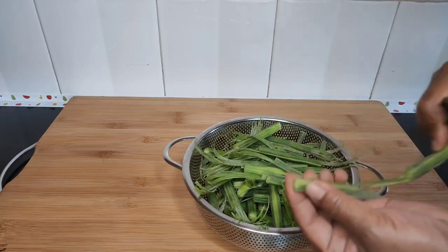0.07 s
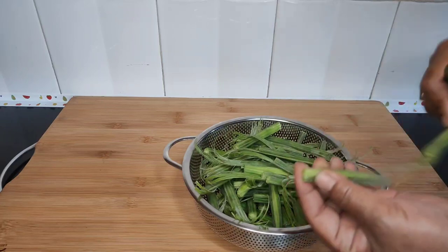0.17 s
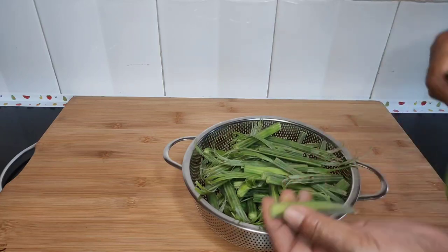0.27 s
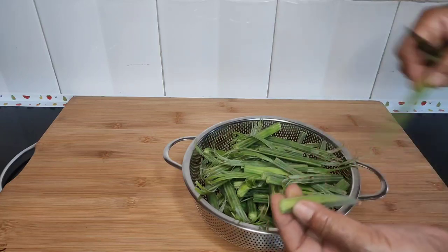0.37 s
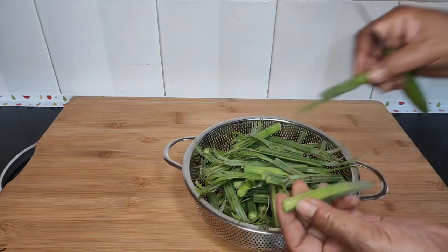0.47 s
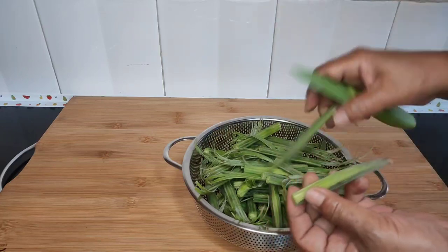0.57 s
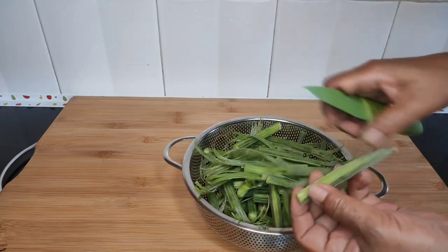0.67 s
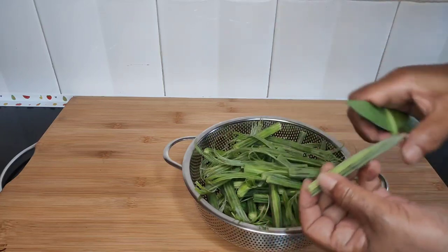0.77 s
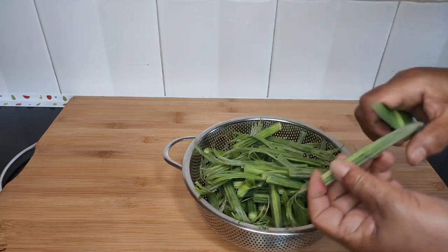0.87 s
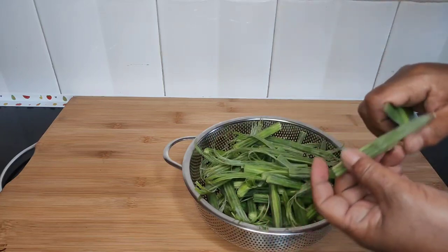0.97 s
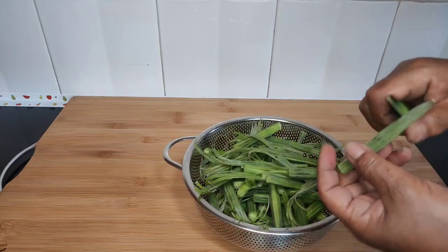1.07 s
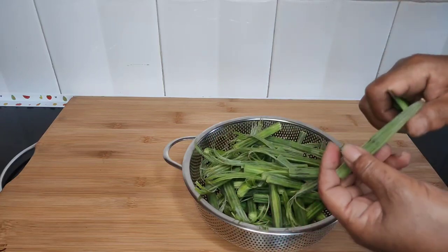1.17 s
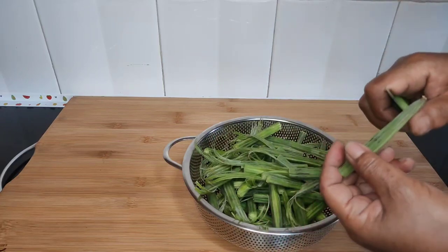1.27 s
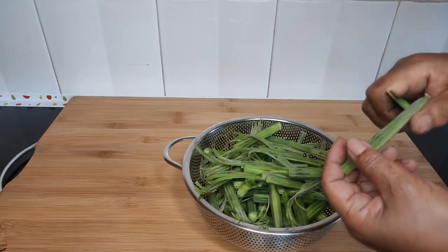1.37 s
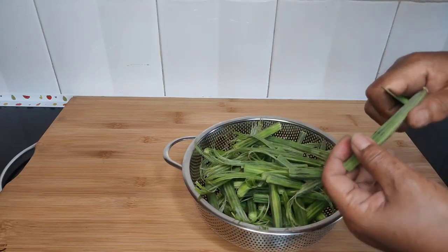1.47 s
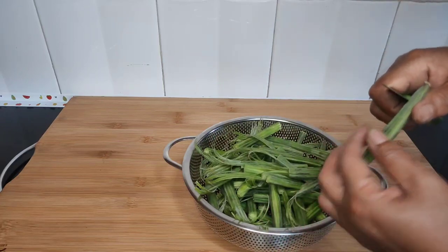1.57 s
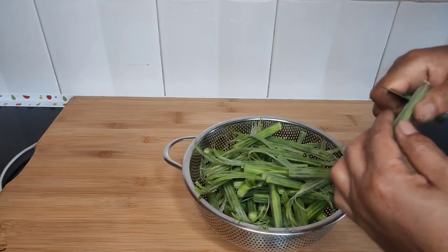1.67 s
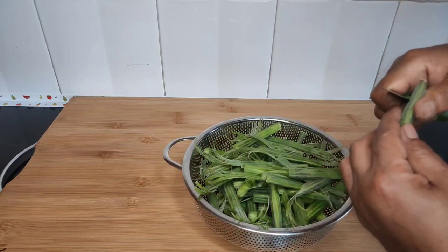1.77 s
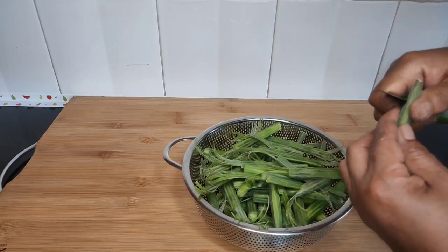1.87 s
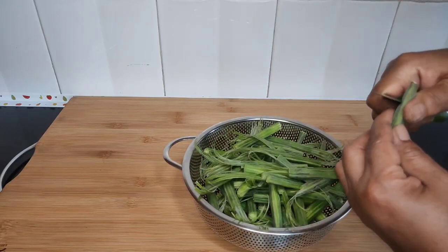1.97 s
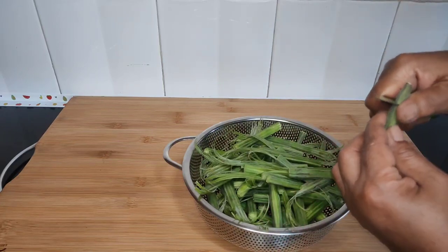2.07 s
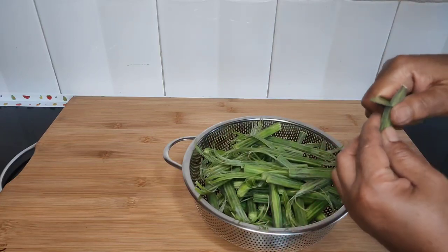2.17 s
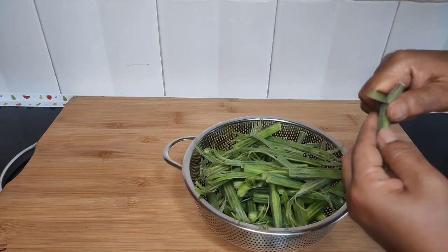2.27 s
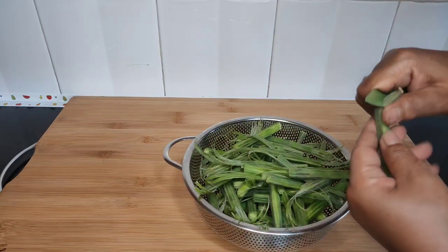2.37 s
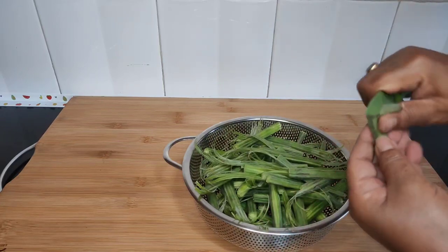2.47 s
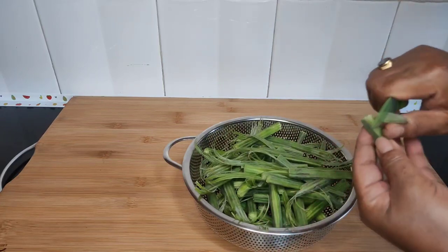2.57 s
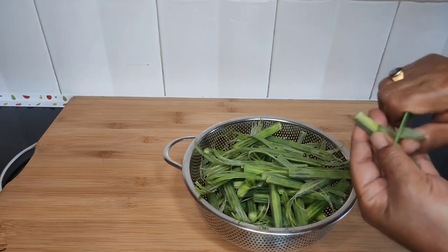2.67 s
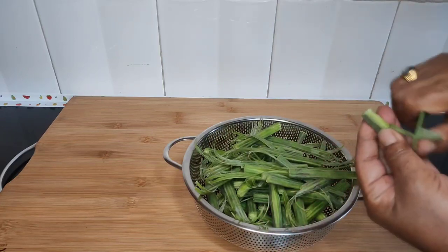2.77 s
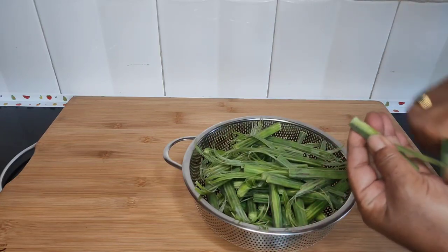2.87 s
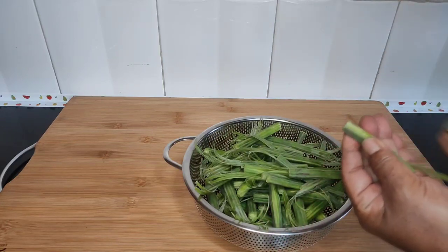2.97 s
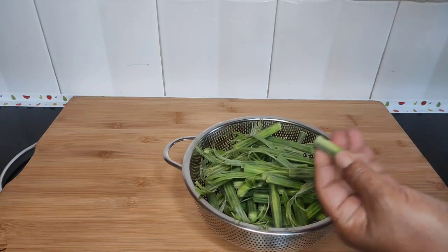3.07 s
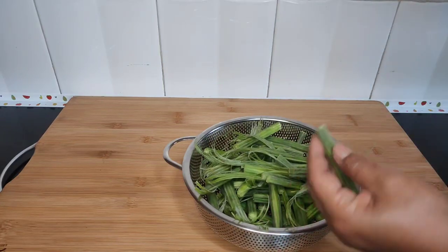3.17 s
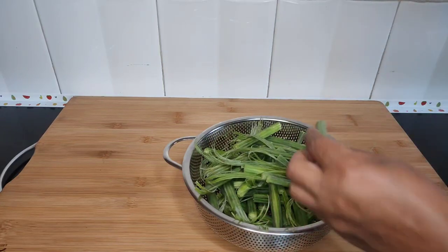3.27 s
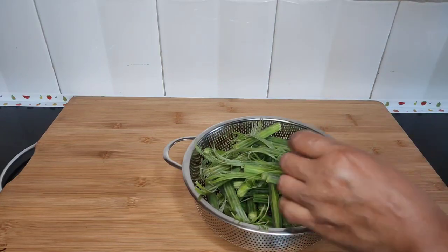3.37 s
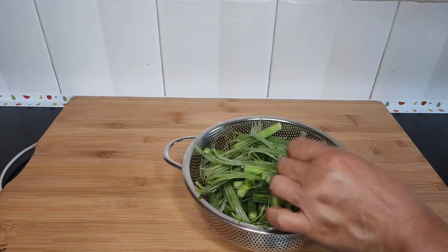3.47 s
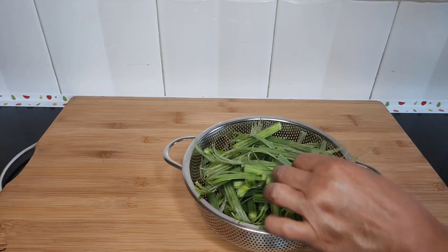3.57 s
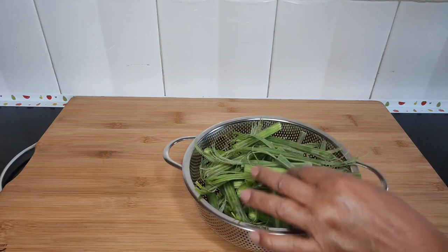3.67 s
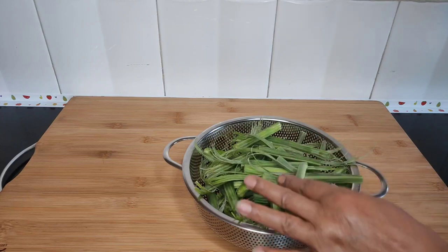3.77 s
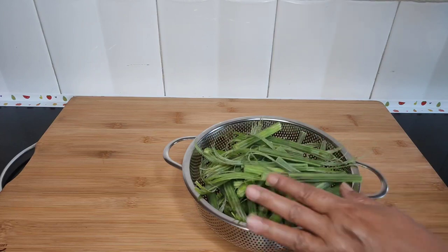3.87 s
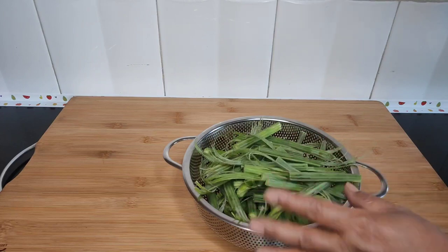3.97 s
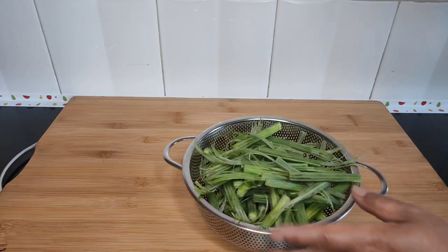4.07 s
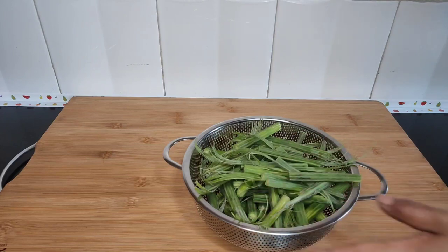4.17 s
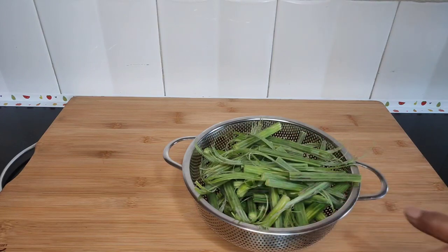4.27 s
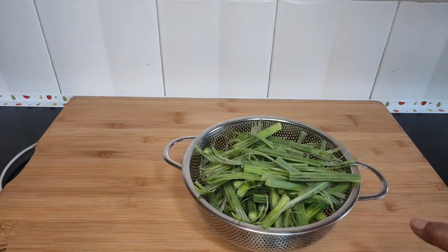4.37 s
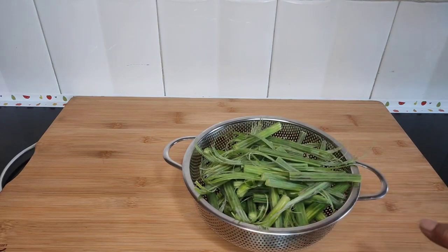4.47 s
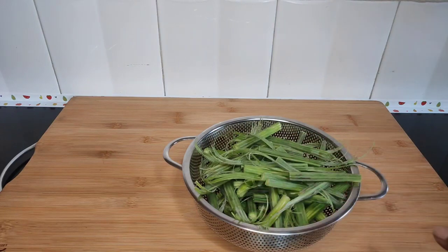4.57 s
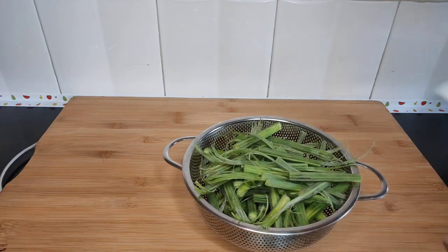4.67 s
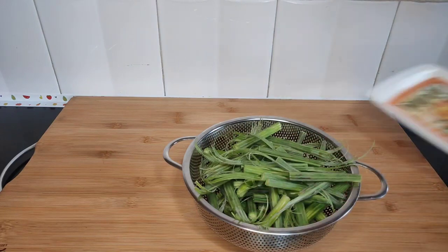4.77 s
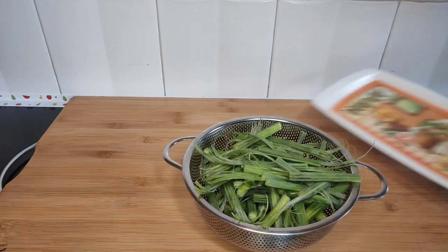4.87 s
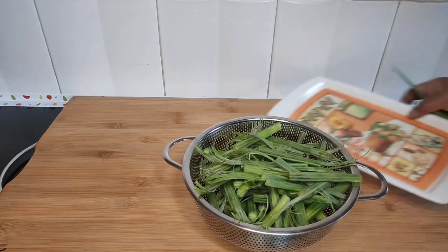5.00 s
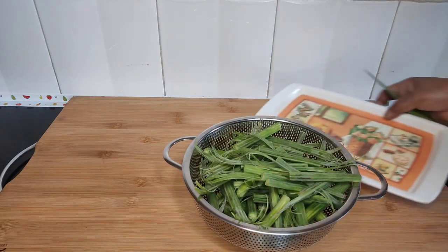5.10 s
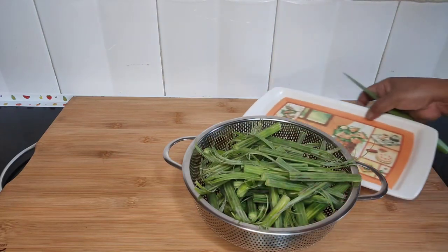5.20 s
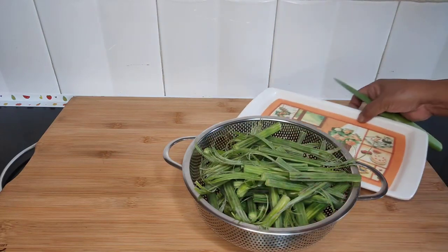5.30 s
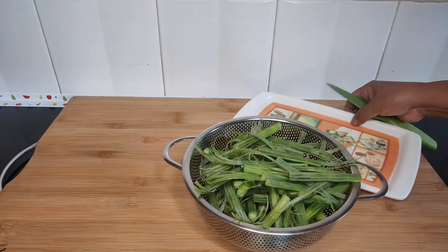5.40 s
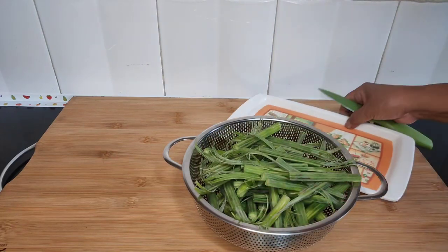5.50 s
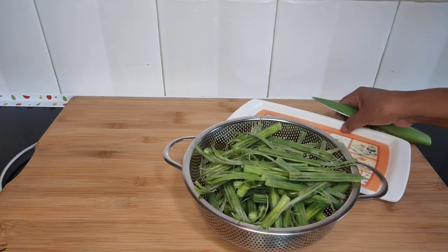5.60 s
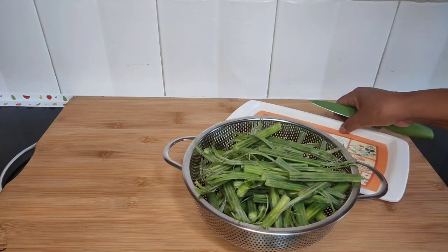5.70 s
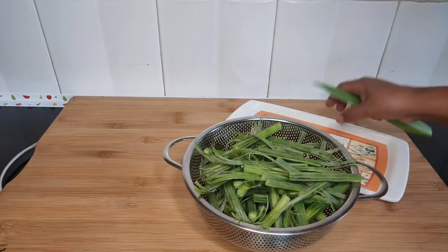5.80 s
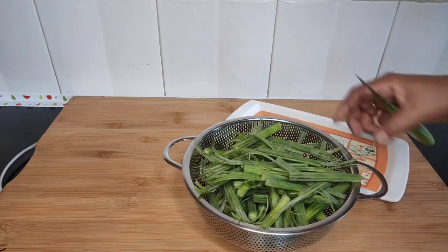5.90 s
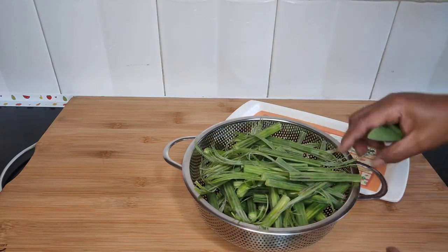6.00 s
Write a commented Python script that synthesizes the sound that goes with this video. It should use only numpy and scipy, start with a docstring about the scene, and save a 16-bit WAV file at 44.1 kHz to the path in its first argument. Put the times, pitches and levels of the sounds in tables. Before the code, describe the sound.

A quiet tiled kitchen, closely miked, with steady low room noise, a soft appliance hum, faint mains buzz and a thin wavering whine throughout. In the first 0.4 seconds come barely audible finger rasps on pod skin and very low puffs of moving air; a soft dull bump follows at 0.7. After a lull, a pod snaps at about 1.96 to 2.1 in a tight run of crisp, popping cracks. Tiny tearing ticks follow from 2.4 to 2.7, then short squeaky, scraping peels around 2.8 to 3.0, with faint touches until 3.9. At 4.3 to 4.5 something slides briefly and knocks on the worktop. At 5.16 a plastic tray clacks loudly, then at 5.32 to 5.34 strikes the metal colander in the loudest clatter, ringing briefly with room echo. Gritty sliding and smaller wooden taps continue to about 5.75, then only the hum remains.

```python
"""Snapping green pods in a kitchen

Green pods are snapped (bursts of noise with a resonant pop) and stripped of their strings by hand
(random slips through filters) over a steel colander in a tiled kitchen. Then a plastic tray slides (fine
grains) and knocks (clacks and dying tones). Puffs of air and one dull bump are low, soft sounds. Steady
room noise, an appliance's hum and whine (drifting tones) and mains buzz (tiny ticks) lie underneath."""
import sys
import numpy as np
from scipy import signal
from scipy.fft import rfft, irfft
from scipy.io import wavfile
from scipy.ndimage import uniform_filter1d

SR = 44100
rng = np.random.default_rng(int(sys.argv[2]) if len(sys.argv) > 2 else 0)


def unload_audio(sound):
    """Save the sound as a 16-bit wav file, at the path given as the first command line argument."""
    columns = np.transpose(np.atleast_2d(sound))
    # keep every value between -1 and 1, then stretch to whole-number steps
    steps = np.round(np.clip(columns, -1, 1) * 32767)
    wavfile.write(sys.argv[1], SR, steps.astype(np.int16))


N = 266364  # length of the scene in samples


def amp(db):
    """Turns decibels into a gain."""
    return 10 ** (np.asarray(db) / 20)


def unit(x):
    """Scales a sound to an rms of one."""
    return x / np.sqrt(np.mean(x ** 2) + 1e-20)


def burst(x):
    """Scales a short sound to the energy of 10 ms at an rms of one."""
    return x / np.sqrt(np.sum(x ** 2) / (SR / 100) + 1e-20)


def read(points, hz):
    """Reads a table of (frequency, value) along a log-frequency axis."""
    f, value = np.transpose(points)
    return np.interp(np.log(hz + 1), np.log(f + 1), value)


def add(mix, s, sound):
    """Mixes a sound in at a time in seconds."""
    part = mix[max(round(s * SR), 0):][:len(sound)]
    part += sound[:len(part)]


def colour(x, points, size=4096):
    """Filters with the given (f/Hz, level/dB) spectrum, without sounding ahead of the input."""
    log_gain = np.log(amp(read(points, abs(np.fft.fftfreq(size, 1 / SR)))))
    minimum_phase = np.exp(np.conj(signal.hilbert(log_gain)))
    taps = np.fft.ifft(minimum_phase).real
    return signal.fftconvolve(x, taps[:size // 2])[:len(x)]


def flatten(x, smooth_hz=260):
    """Evens out the broad humps in the spectrum of a short noise."""
    f = np.fft.rfftfreq(len(x), 1 / SR)
    power = uniform_filter1d(abs(rfft(x)) ** 2, max(round(smooth_hz / f[1]), 1))
    return colour(x, np.c_[f, -10 * np.log10(power / power.mean() + 1e-6)])


def resonate(x, hz, width):
    """Passes a sound through one resonance, width in Hz."""
    return signal.lfilter(*signal.iirpeak(hz, hz / width, fs=SR), x)


def resonate_twice(x, hz, width):
    """Two resonances in a row at one pitch, the second twice as wide."""
    return resonate(resonate(x, hz, width), hz, 2 * width)


def line(hz, width):
    """Noise squeezed into a narrow band: a tone that wavers within the given width in Hz."""
    f = np.fft.rfftfreq(N, 1 / SR)
    spectrum = rfft(rng.standard_normal(N)) / (1 + ((f - hz) / width) ** 4)
    return unit(irfft(spectrum, N))


def tone(hz, width):
    """A steady sine whose pitch drifts by about the given width in Hz."""
    drift = line(0, 8)
    return np.sqrt(2) * np.sin(2 * np.pi * np.cumsum(hz + width * drift) / SR)


def grains(per_s, spread_db):
    """Random tiny slips of very uneven size."""
    size = amp(spread_db * np.minimum(rng.exponential(1, N), 4))
    sign = rng.choice([-1, 1], N)
    return unit(size * sign * (rng.random(N) < per_s / SR))


def stroke(start, length, attack_s, swell_db_per_s, release_s):
    """Gain of one rubbing movement: it takes hold, swells as it gathers speed, and lets go."""
    t = np.arange(N) / SR - start
    swell = amp(swell_db_per_s * (np.clip(t, 0, length) - length / 2))
    release = np.exp(-np.maximum(t - length, 0) / release_s)
    return np.clip(t / attack_s, 0, 1) * swell * release


def room_air(air_db=-52.5):
    """Steady room noise: random hiss shaped to be strongest in the bass."""
    # spectrum of the room noise: f/Hz, level/dB
    air_colour = [(20, -1.5), (36, -1), (70, -10.5), (140, -8), (210, -15), (300, -15), (450, -19),
                  (765, -24), (2000, -35.5), (3300, -37), (5500, -42), (7500, -43.5), (9000, -63.5)]
    return amp(air_db) * unit(colour(rng.standard_normal(N), air_colour, size=16384))


def buzz(buzz_db=-69.0, lopsided_s=0.00027, mains_hz=60.1):
    """Mains buzz: a tiny tick in every half cycle, the two halves not quite equal in length."""
    # spectrum that shapes the ticks: f/Hz, level/dB
    buzz_colour = [(500, -5.5), (3000, 0), (4800, 2), (6800, 0.5), (7600, -3), (8200, -17.5)]
    k = np.arange(int(2 * mains_hz * N / SR) - 1)
    jitter = rng.normal(0, 1e-5, len(k))  # seconds
    at = (k + 1) / (2 * mains_hz) + lopsided_s * (k % 2) + jitter
    ticks = np.bincount(np.round(at * SR).astype(int), minlength=N)[:N].astype(float)
    return colour(amp(buzz_db) * unit(ticks), buzz_colour)


def hum():
    """The appliance hums: a handful of sines, each with its own slight drift in pitch."""
    # tones of the appliance: f/Hz, level/dB, drift width/Hz
    hum_tones = [(95, -64, 2.7), (178.4, -58.5, 0.4), (368, -68.5, 5), (439, -68.5, 3.84), (2235, -79, 30),
                 (2350, -86, 2.4), (2380, -82.5, 2)]
    return sum(amp(db) * tone(hz, width) for hz, db, width in hum_tones)


def whine(whine_hz=3587, whine_width=5, fuzz_hz=3560, fuzz_width=170):
    """The appliance whines: a thin tone in a fuzzy band, wavering in level and swelling now and then."""
    # swells of the whine: middle t/s, width/s, tone rise/dB, fuzz rise/dB
    whine_swells = [(0.47, 0.073, 6.5, 4), (3.55, .16, 4.5, 9), (4.87, 0.17, 4, 14)]
    t = np.arange(N) / SR
    waver = 2 * line(0, 1.5)  # dB; slow, below about 1.5 Hz
    tone_db, fuzz_db = -79.5 + waver, -82 + waver
    for s, width, tone_rise_db, fuzz_rise_db in whine_swells:
        arch = np.exp(-((t - s) / width) ** 2)
        tone_db = tone_db + tone_rise_db * arch
        fuzz_db = fuzz_db + fuzz_rise_db * arch
    return amp(tone_db) * tone(whine_hz, whine_width) + amp(fuzz_db) * line(fuzz_hz, fuzz_width)


def background():
    """Room noise, mains buzz and the hum and whine of an appliance, added together."""
    return room_air() + buzz() + hum() + whine()


def wafts(waft_hz=28, waft_width=14):
    """The moving hands push air: soft, very low puffs cut from a band of rumbling noise."""
    # puffs: middle t/s, level before fading in and out/dB, length/s
    puffs = [(0.12, -44.5, .16), (0.325, -39.5, .13), (3.492, -43, 0.1)]
    out, air = np.zeros(N), line(waft_hz, waft_width)
    for s, db, length in puffs:
        puff = air[round(s * SR):][:round(length * SR)]
        add(out, s - length / 2, amp(db) * unit(puff) * np.hanning(len(puff)))
    return out


def bump(start_s=0.712, peak_db=-53.5, hz=408, rise_s=0.022):
    """One soft, dull bump: a low, damped note that rises softly and dies."""
    age = np.maximum(np.arange(N) / SR - start_s, 0)
    swell_and_die = age / rise_s * np.exp(1 - age / rise_s)
    return amp(peak_db) * swell_and_die * np.sin(2 * np.pi * hz * age)


def slides(attack_s=0.017, swell_db_per_s=10, release_s=0.012):
    """The foot of the tray glides with a fine hiss and now and then catches in small ticks."""
    # pushes of the tray: start t/s, length/s, level halfway/dB, catching (0 glides, 1 only ticks)
    pushes = [(4.301, 0.088, -58, 0.02), (4.394, 0.042, -45, 0.3), (5.369, .15, -54, 0.5),
              (5.524, 0.11, -50.5, 0.2), (5.63, 0.11, -63, 0.76)]
    # spectrum of the rubbing: f/Hz, level/dB
    slide_colour = [(200, -19.5), (600, 0.5), (1100, 0.5), (2000, 7.5), (3000, 3.5), (4200, -2), (5500, -8),
                    (8000, -20.5)]
    glide = unit(colour(grains(per_s=6900, spread_db=3.0), slide_colour))
    ticks = unit(colour(grains(per_s=240, spread_db=2), slide_colour))
    out = np.zeros(N)
    for start, length, db, catching in pushes:
        share = np.clip(catching, 0, 1)
        foot = np.sqrt(1 - share) * glide + np.sqrt(share) * ticks
        out += amp(db) * stroke(start, length, attack_s, swell_db_per_s, release_s) * foot
    return out


def ring(modes, t):
    """Dying tones set going together, neighbours in the list swinging in opposite directions."""
    total = np.zeros(len(t))
    for k, (hz, db, t60) in enumerate(modes):
        total += (-1) ** k * amp(db - 60 * t / t60) * np.sin(2 * np.pi * hz * t)
    return burst(total)


def knocks(rise_s=0.00083):
    """Each contact is a short clack of crowded plastic and wood modes; the struck body rings on."""
    # tray knocks: t/s, clack level/dB, hardness as treble/dB, name of the struck body
    hits = [(4.4116, -37.5, 6, "worktop"), (4.42, -41, 9, "worktop"), (4.463, -28, 2, "worktop"),
            (4.9716, -60, 19, "worktop"), (5.1586, -17.5, 6, "tray"), (5.202, -26.5, -18, "colander"),
            (5.3191, -18.5, 3.5, "colander"), (5.322, -18.5, 2, "colander"),
            (5.337, -13.5, 2.5, "colander"), (5.3714, -32.5, -6, "colander"), (5.388, -29, -10, "colander"),
            (5.42, -34.5, -7, "board"), (5.488, -34, -15, "board"), (5.558, -49.5, -14, "board"),
            (5.6222, -33.5, -3.5, "board"), (5.7226, -32, -3.5, "board")]
    # spectrum of the clack: f/Hz, level/dB
    clack_colour = [(60, -23.5), (140, -13), (220, -13.5), (330, 1), (500, -7.5), (720, 5), (1020, 2.5),
                    (1400, 1.5), (1900, -2.5), (2400, -2), (3000, -6), (3700, -16), (4700, -22.5),
                    (6000, -32), (8000, -42.5)]
    # how each body answers, by name: time for the clack to fall 60 dB/s, bass/dB, ring against clack/dB
    contacts = {"worktop": (.055, -15.5, 0.98), "tray": (0.037, 2.2, -1), "colander": (.033, -2, -6),
                "board": (.05, 2, -1.6)}
    # ringing tones of each body, by name: f/Hz, level/dB, time to fall 60 dB/s
    bodies = { "worktop": [(323, -2, 0.082), (753, -5, 0.19), (807, -6.5, 0.3), (934, -6, 0.25),
              (987, -0.5, 0.14), (1043, -5, 0.13), (1264, -14, 0.081), (1308, 4.5, 0.16), (1313, -12, 0.15),
              (1423, -7.5, 0.23), (1770, -6, 0.13), (1884, 0.5, 0.12), (2220, -16.5, 0.28),
              (2500, -7.5, 0.13), (2610, -25.5, .2), (4330, -22.5, 0.14)], "tray": [(311.4, -10, .17),
              (332.7, -1, 0.17), (702.5, -0.5, .22), (764, 8, .08), (720, -6.5, .35), (860, -23, 0.22),
              (1060, -4.5, 0.3), (1322, -5.5, 0.36), (1385, -7.5, .15), (1807, -0.5, 0.34),
              (1940, -14, 0.21), (2310, -15, 0.2), (2550, -7.5, 0.12), (2950, 2, 0.071),
              (3300, -10, 0.099)], "colander": [(293.7, -6, 0.47), (717, -4.5, 0.36), (723, -10.5, 0.43),
              (876, -4, 0.28), (944, 4, 0.28), (1005, 6.5, 0.21), (1053.4, 3, 0.29), (1160, -6, .25),
              (1298, -1.5, 0.4), (1400, -12, .35), (1450, -10, .35), (1780, -13, 0.32), (2255, -5, .22),
              (2450, -18, 0.26), (2700, -9, 0.1), (3270, -12, 0.12), (3270, -8.5, 0.072),
              (3660, -25, 0.59)], "board": [(431, 1.5, 0.17), (490, -5, 0.13), (569, -1.5, 0.13),
              (806, 3, 0.23), (854, 4, 0.078), (1012, 0.5, 0.043), (1400, -13, .1), (1630, -14.5, 0.078)]}
    out, t = np.zeros(N), np.arange(SR * 3 // 4) / SR
    for s, db, treble_db, body in hits:
        t60, bass_db, ring_db = contacts[body]
        # a harder corner gives more treble
        contact = [(450, bass_db), (850, 0), (1300, 0.0095), (3500, treble_db)]
        chatter = flatten(rng.choice([-1, 1], len(t)) * amp(-60 * t / t60))
        clack = burst(colour(colour(chatter, clack_colour), contact))
        ringing = amp(ring_db) * ring(bodies[body], t)
        soft_start = 1 - np.exp(-t / rise_s)
        add(out, s, amp(db) * (clack + ringing) * soft_start)
    return out


def peels(squeak_hz=2200, squeak_width=300, scrape_hz=4200, scrape_width=1500):
    """A string unzips cell by cell, the fingers squeak on the skin and a nail scrapes along it."""
    # finger strokes: start t/s, length/s, rasp level halfway/dB, wetness/dB (wet squeaks, dry scrapes)
    strokes = [(0.0, 0.06, -66.5, -9.5), (0.07, .03, -66.5, -6), (0.185, 0.033, -65.5, -7),
               (2.775, 0.07, -65.5, -10), (2.85, .125, -60.5, 0.5), (2.966, 0.013, -58.5, 9.5),
               (2.985, 0.027, -54, -3.5), (3.125, 0.033, -72, -11), (3.295, 0.028, -72, -7),
               (3.355, 0.027, -65.5, -6)]
    # spectrum of the rasp: f/Hz, level/dB
    peel_colour = [(200, -16), (650, 10), (1100, -2), (1500, 0), (2200, 6), (2900, 1), (4000, -6.5),
                   (4900, -4), (6000, -2.5), (8000, -6.5)]
    squeak_db, scrape_db = -4, -9  # against the rasp, at a wetness of 0 dB
    attack_s, swell_db_per_s, release_s = 0.0065, 68, 0.0085
    rasp = unit(colour(grains(per_s=840, spread_db=3), peel_colour))
    slips = grains(per_s=2800, spread_db=3.0)
    squeak = unit(resonate_twice(slips, squeak_hz, squeak_width))
    scrape = unit(resonate_twice(slips, scrape_hz, scrape_width))
    out = np.zeros(N)
    for start, length, db, wet_db in strokes:
        skin = rasp + amp(squeak_db + wet_db) * squeak + amp(scrape_db - wet_db) * scrape
        out += amp(db) * stroke(start, length, attack_s, swell_db_per_s, release_s) * skin
    return out


def snaps(pop_hz=1320, pop_width=600, die_s=0.0015, after_db=-18, after_t60=0.11, uneven_db=3):
    """A run of fibres gives way; each break pops the flesh, and hands and board scatter it."""
    # fibres breaking: t/s, level/dB, length of the break/s, thinness as low-end loss of the crack/dB
    breaks = [(0.201, -61, 0.0061, -7), (0.372, -67, .0066, 26), (1.9602, -42.5, 0.0016, 4),
              (1.9842, -43, .0005, 4), (2.0, -52, 0.0011, 0), (2.004, -47, 0.0013, 1),
              (2.049, -47, 0.00086, -4), (2.0823, -59, .001, 2), (2.0862, -38, 0.0033, -2.5),
              (2.0891, -37, 0.0039, -6), (2.1036, -47, 0.0036, -2), (2.41, -64, .0045, 5.5),
              (2.506, -61.5, .0056, 4), (2.534, -62, 0.006, 5), (2.608, -63, .002, 3),
              (2.628, -56.5, 0.02, 5), (2.651, -46.5, 0.0091, 12), (2.681, -58, .004, -4),
              (3.47, -58, 0.0076, -13), (3.94, -58, 0.0082, -8.5)]
    # spectrum of the crack: f/Hz, level/dB
    snap_colour = [(100, 4), (250, 3.5), (600, 0.5), (1400, -1.5), (1700, -5), (2100, -0.5), (2700, 4.5),
                   (3700, -1.5), (4600, 6.5), (5600, -4), (6300, 1.5), (7400, 1.5), (8400, -19.5)]
    # a quick break pops the flesh, a slow tear hardly does
    quick_pop_db, pop_fall_db_per_s = 1, 3600
    out, t = np.zeros(N), np.arange(SR // 8) / SR
    for s, db, length, thin_db in breaks:
        scatter = amp(after_db - 60 * t / after_t60)
        tearing = np.exp(-np.maximum(t - length, 0) / die_s) + scatter
        uneven = amp(uneven_db * rng.standard_normal(len(t)))
        fibres = flatten(rng.standard_normal(len(t)) * uneven * tearing, smooth_hz=587)
        crack = burst(colour(colour(fibres, snap_colour), [(1500, -thin_db), (5000, 0)]))
        pop = burst(resonate_twice(fibres, pop_hz, pop_width))
        pop_gain = amp(quick_pop_db - pop_fall_db_per_s * length)
        add(out, s, amp(db) * burst(crack + pop_gain * pop))
    return out


def kitchen(x, build_s=0.0014):
    """Dense echoes off the tiles: a noise tail in which each band dies at its own speed."""
    # echo of the room: f/Hz, time to fall 60 dB/s
    echo_times = [(150, 0.75), (400, 0.89), (900, 0.83), (1800, 0.59), (3500, 0.48), (8000, 0.7)]
    hz, t, z = signal.stft(rng.standard_normal(SR), SR, nperseg=256)
    decay = amp(-60 * t / read(echo_times, hz)[:, None])
    tail = signal.istft(z * decay, SR, nperseg=256)[1]
    tail *= 1 - np.exp(-(np.arange(len(tail)) / SR / build_s) ** 2)  # the echoes build up first
    return signal.fftconvolve(x, tail / np.linalg.norm(tail))[:N]


def scene(pod_room_db=-7, tray_room_db=-9):
    """Pods and tray with their echoes in the kitchen, over the bump, puffs and background."""
    # what the walls return of the pods: f/Hz, level/dB
    snap_echo = [(200, -7), (900, -6.5), (1700, -10.5), (3000, 2.5), (4600, -5), (6600, -1), (8000, -12)]
    pods, tray = snaps() + peels(), knocks() + slides()
    room = kitchen(amp(pod_room_db) * colour(pods, snap_echo) + amp(tray_room_db) * tray)
    return (pods + tray + room + bump() + wafts() + background())[None]


def record(dry, edge_hz=8050):
    """The recorder's band limit: a steep filter takes away the treble above the edge."""
    taps = signal.firwin(121, edge_hz, window=("kaiser", 5.5), fs=SR)
    return signal.oaconvolve(dry, taps[None], "same")


dry = scene()
out = record(dry)
unload_audio(out)
```